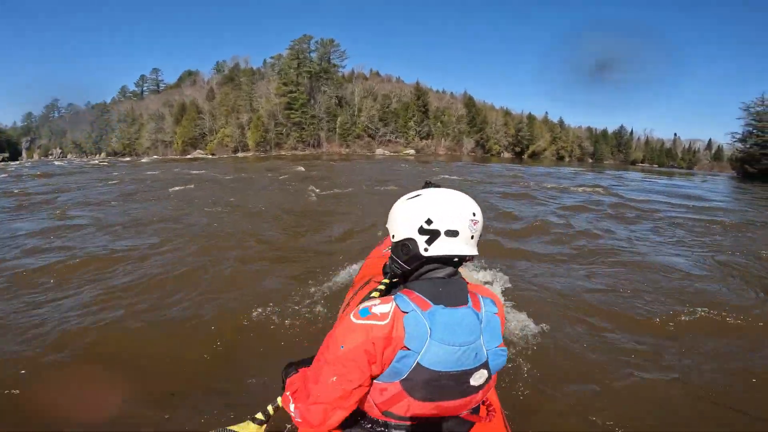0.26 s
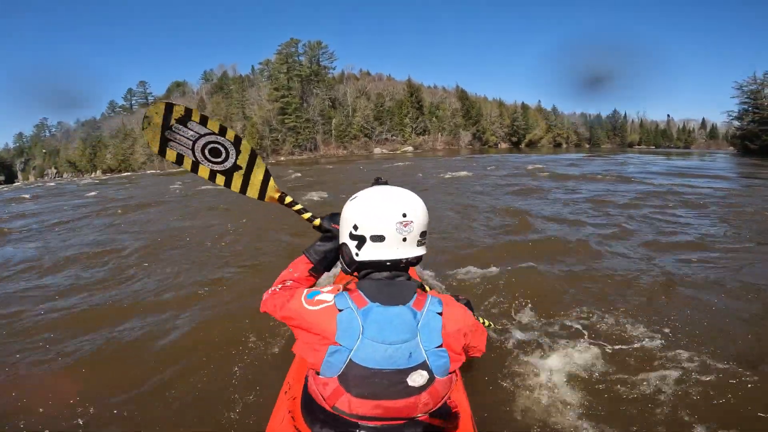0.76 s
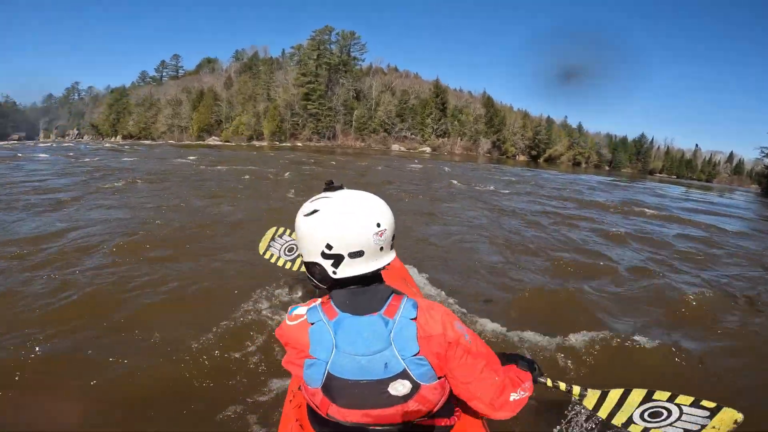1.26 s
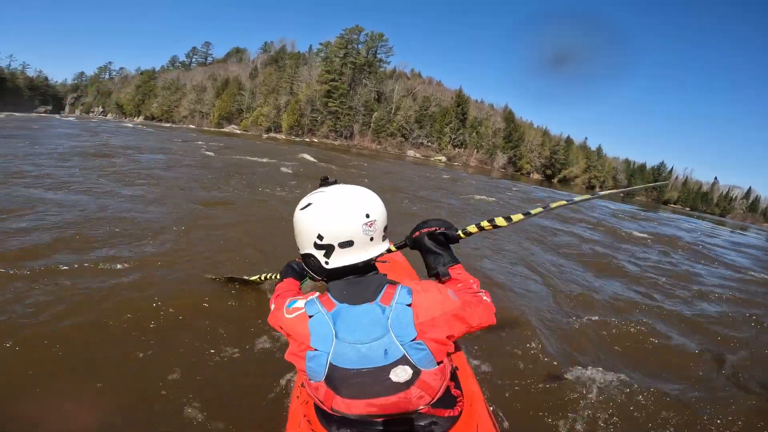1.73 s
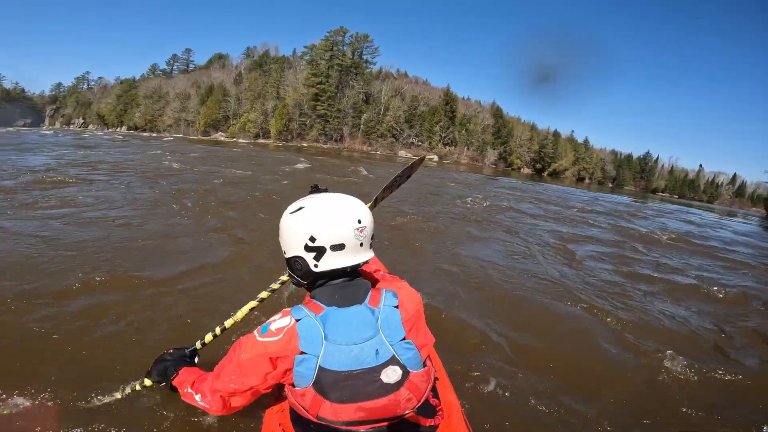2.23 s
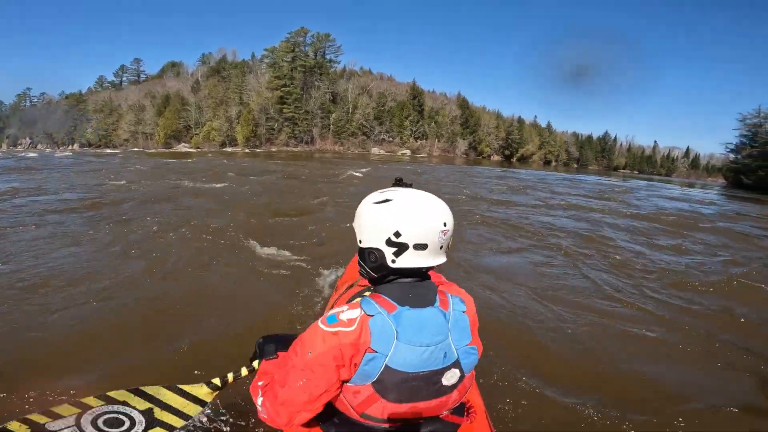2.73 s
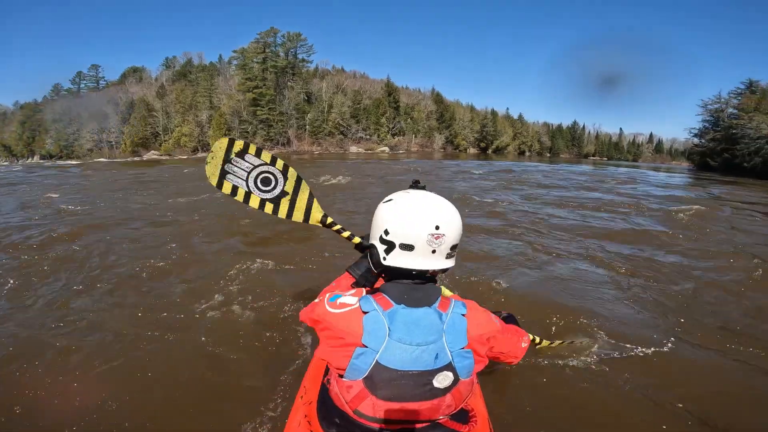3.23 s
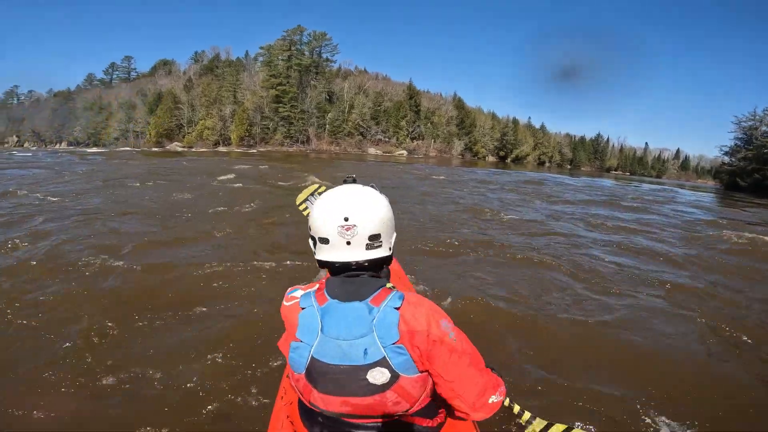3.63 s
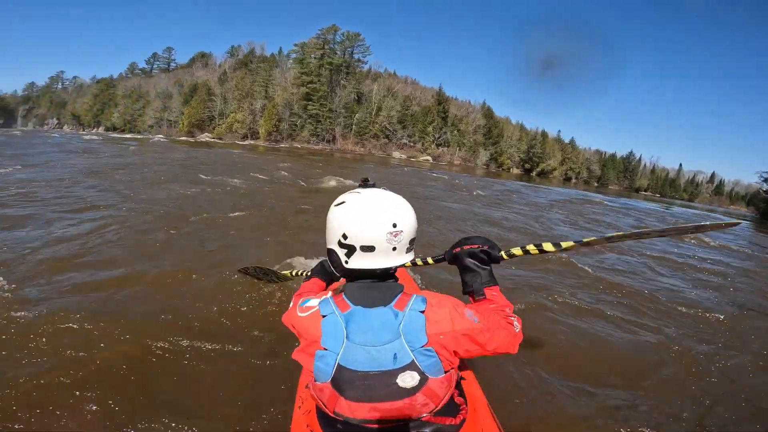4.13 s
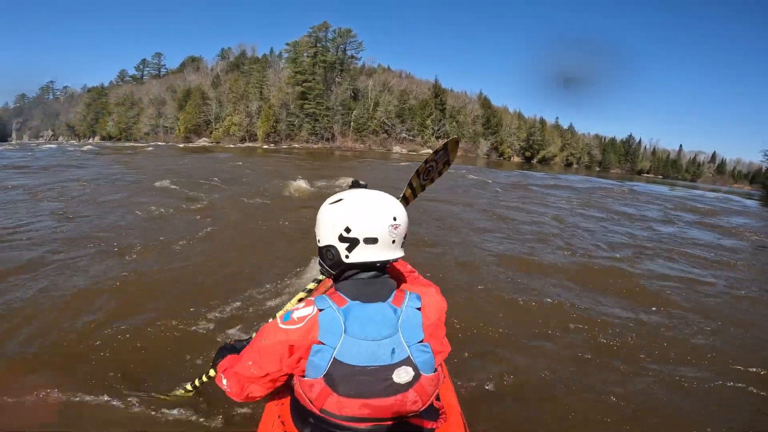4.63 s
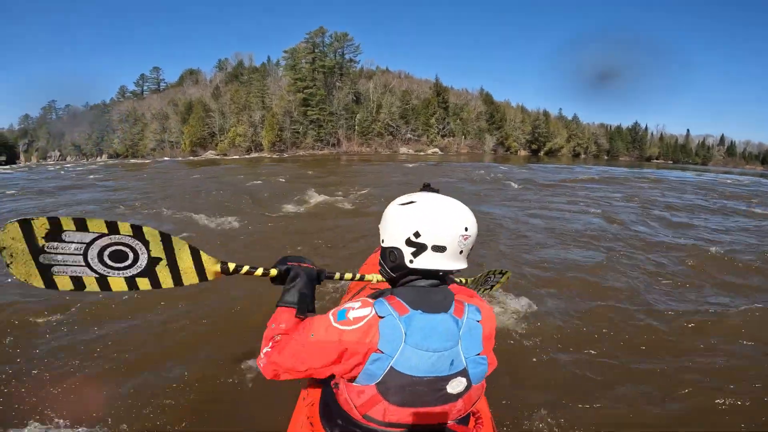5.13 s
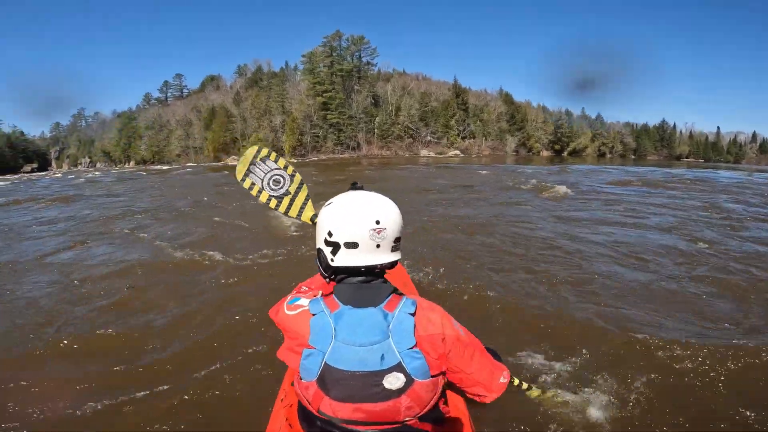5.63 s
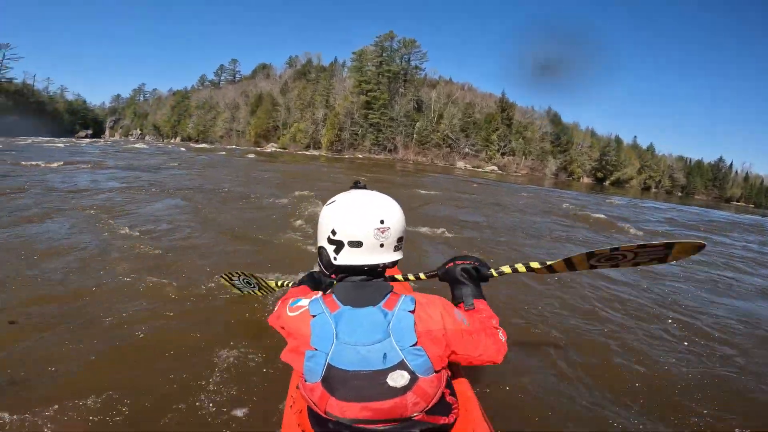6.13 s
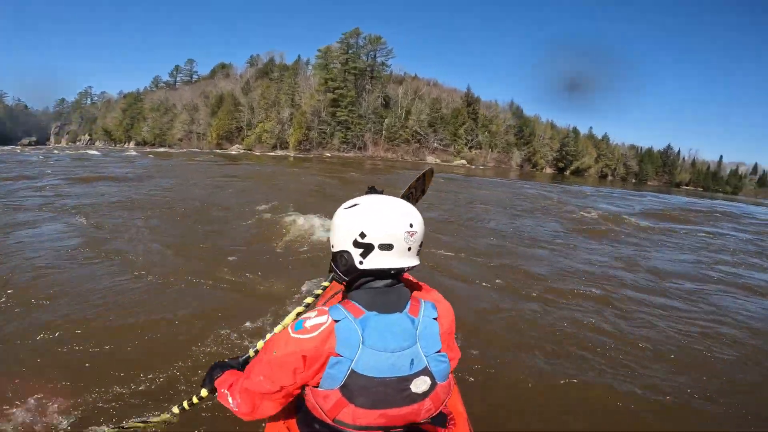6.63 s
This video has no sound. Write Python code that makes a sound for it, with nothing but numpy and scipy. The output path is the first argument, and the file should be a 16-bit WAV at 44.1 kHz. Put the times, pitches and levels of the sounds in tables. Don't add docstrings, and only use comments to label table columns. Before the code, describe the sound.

On a fast river, a microphone rides the stern of a plastic kayak. From 0 to 1 s a paddle stroke throws bright, grainy spray; sheets of water land, bubbles pop, drops tick on the housing, and wind buffets in low, heavy thumps. Between about 1 and 1.3 s the open hiss fades rapidly and the sound becomes muffled, briefly spreading wider before narrowing toward the centre. From 1.5 to 2.5 s it is quiet, with small hollow plops and slaps. Around 2.6 to 3.6 s waves boom in the hull, with a cluster of knocks and deep glugs. It calms somewhat around 4 s, with low gurgles and soft wind. From 5 to 6.8 s sloshing, slaps and rounded glugs grow busier again. Very faint rapids and a thin, high crackle of droplets at the left linger beneath.

```python
import sys
import numpy as np
from scipy import signal
from scipy.fft import rfft, irfft, next_fast_len
from scipy.io import wavfile
from scipy.ndimage import uniform_filter1d, map_coordinates

SR = 44100
rng = np.random.default_rng(int(sys.argv[2]) if len(sys.argv) > 2 else 0)


def master(y):
    cut = np.clip(np.atleast_2d(y).T, -1, 1)
    pcm = np.round(cut * 32767)
    wavfile.write(sys.argv[1], SR, pcm.astype(np.int16))


def attenuation_scalar(level_db):
    decades = np.asarray(level_db, float) / 20
    return 10 ** decades


N = 302967
SPRAY_FADE_DB_PER_S, BODY_FADE_DB_PER_S = 53.5, 50.5


def unit(x):
    return x / np.sqrt(np.mean(x ** 2) + 1e-20)


def add(track, start, sound):
    track[start:start + len(sound)] += sound


def curves(rows):
    s, *cols = np.transpose(rows)
    return [np.interp(np.arange(N) / SR, s, c) for c in cols]


def filtered(x, response):
    m = next_fast_len(N + SR // 2)
    return irfft(rfft(x, m) * response(np.fft.rfftfreq(m, 1 / SR)), m)[..., :N]


def lowpass(x, hz, power):
    return filtered(x, lambda f: 1 / (1 + (f / hz) ** power))


def tone(points):
    f, v = np.transpose(points)
    return lambda hz: attenuation_scalar(np.interp(np.log(hz + 1), np.log(f + 1), v, -120, -120))


def modes(table):
    def response(f):
        total = 0
        for k, (c, w, db) in enumerate(table):
            total = total + (-1) ** k * attenuation_scalar(db) * 1j * f * w / (c * c - f * f + 1j * f * w)
        return total
    return response


def churn(patchy_db, grain_db, grain_rate):
    z = signal.stft(rng.standard_normal(N), nperseg=512)[2]
    field = uniform_filter1d(uniform_filter1d(rng.standard_normal(z.shape), 8, 0), 5, 1)
    x = signal.istft(z * attenuation_scalar(patchy_db * unit(field)), nperseg=512)[1][:N]
    knots = rng.standard_normal(N // 16)
    grain = map_coordinates(knots, [np.arange(N) * min(grain_rate, 2500) / SR], order=1)
    return x * attenuation_scalar(grain_db * grain)


def droplets(rate, spread_db):
    chance, size = rng.random(N), rng.exponential(size=N)
    return unit((chance < rate / SR) * attenuation_scalar(spread_db * size))


def surges(peak_s, peak_db, fall_s, rise_share, calm_db):
    t = np.arange(0, N + 64, 64) / SR
    late = (t[:, None] - peak_s) / np.maximum(fall_s, .003)
    away = np.where(late < 0, -late / rise_share, late)
    gain = np.sqrt(attenuation_scalar(calm_db) ** 2 + np.sum(attenuation_scalar(peak_db - 10 * away) ** 2, axis=1))
    return np.interp(np.arange(N) / SR, t, gain)


def steadied(x, seconds, share):
    size = max(int(seconds * SR), 1)
    power = np.abs(uniform_filter1d(uniform_filter1d(x ** 2, size), size))
    return unit(x / (power + 1e-12) ** (np.clip(share, 0, 1) / 2))


def ring(s, db, hz, t60, rise, rough, attack):
    t = np.arange(SR // 4) / SR
    drift = np.cumsum(rng.standard_normal(len(t))) * rough
    shape = attenuation_scalar(db - 60 * t / np.clip(t60, .002, .3)) * (1 - np.exp(-t / attack))
    return round(s * SR), shape * np.sin(2 * np.pi * hz * t * (1 + rise * t) + drift)


def faded_s():
    return np.maximum(np.arange(N) / SR - 1.0, 0)


def sheltered():
    return np.clip((np.arange(N) / SR - 1.05) / 0.14, 0, 1)


# (time [s], level [dB])
SPLASH_LEVEL = [
    (0, -38),
    (.11, -40),
    (.28, -34.5),
    (.34, -36.5),
    (.55, -33),
    (.75, -35),
    (1.0, -36),
]
# (frequency [Hz], level per Hz [dB])
HISS_TONE = [(900, -10), (1500, -4.5), (3330, -3.5), (5060, -8), (5980, -11), (7350, -25), (8500, -36.5),
             (10500, -47), (12000, -48.5), (15700, -73)]
# (time [s], peak level [dB], time to fall 10 dB [s])
SHEETS = [(0.024, -23, -0.1), (0.093, -34.5, -0.1), (0.128, -44, 0.1), (0.192, -33.5, -0.09),
          (0.2117, -41, -0.1), (.3656, -33, -0.04), (.435, -35, -0.04), (.5067, -49, 0.5), (.5252, -34, 0),
          (0.56, -28, 0.01), (.6085, -26.5, 0.02), (.6809, -39, 0.1), (.72, -36.5, 0.1),
          (0.9025, -40, 0.04)]


def spray_hiss():
    grains = unit(churn(patchy_db=.9, grain_db=1.6, grain_rate=900))
    hiss = unit(filtered(grains + .3 * droplets(rate=500, spread_db=2.2), tone(HISS_TONE)))
    sheet_gain = surges(*np.transpose(SHEETS), rise_share=0.59, calm_db=-90)
    sheets = sheet_gain * lowpass(np.roll(hiss, SR), 5200, 4)
    fade = np.hypot(attenuation_scalar(-SPRAY_FADE_DB_PER_S * faded_s()), attenuation_scalar(-20.5 - 21.5 * faded_s()))
    return fade * (attenuation_scalar(curves(SPLASH_LEVEL)[0] - 0.83) * hiss + sheets)


# (frequency [Hz], level per Hz [dB])
SPLASH_BODY_TONE = [(150, -11), (250, 5), (500, -2), (1000, -6.5), (1700, -14.5), (2600, -40)]


def splash_body():
    body = unit(filtered(churn(patchy_db=1.34, grain_db=1.5, grain_rate=210), tone(SPLASH_BODY_TONE)))
    heave = surges(0.375, -30, 0.18, rise_share=0.23, calm_db=-33)
    return heave * attenuation_scalar(1.5 - BODY_FADE_DB_PER_S * faded_s()) * body


def bubbling(rate, hz, spread, cycles):
    start, pitch, size = rng.random((3, int(rate * N / SR)))
    pitch_hz, t = hz * np.exp(spread * (2 * pitch[:, None] - 1)), np.arange(512) / SR
    age = t * pitch_hz / cycles
    shape = (size[:, None] + .03) ** -.6 * age * np.exp(-3 * age)
    wave = shape * np.sin(2 * np.pi * pitch_hz * t * (1 + 0.11 * age))
    where = (start[:, None] * N).astype(int) + np.arange(512)
    return unit(np.bincount(where.ravel(), wave.ravel(), N + 512)[:N])


def froth():
    s, db, fall_s, bright_db = np.transpose(SHORT_WAVES)
    splash_db = curves(SPLASH_LEVEL)[0] - SPRAY_FADE_DB_PER_S * faded_s()
    plips = sheltered() * surges(s, db + bright_db - 31, fall_s, rise_share=0.42, calm_db=-85)
    foam = lowpass(bubbling(260, 2300, .7, 8), 5000, 8)
    return attenuation_scalar(splash_db - 9) * foam + plips * bubbling(90, 1150, .45, 9)


# (time [s], peak level [dB], time to fall 10 dB [s])
WIND_GUSTS = [(.05, -21, .5), (.46, -21.5, 0.32), (.72, -23.5, .5), (1.14, -21.5, 0.1), (1.419, -26, -0.94),
              (1.55, -30, -1.27), (1.86, -38.5, 0.14), (2.09, -40.5, 0.1), (2.242, -31, 0.03),
              (2.47, -39, 0.5), (2.64, -32, 0.16), (2.81, -35, 0.37), (3.17, -33, 0.26), (3.46, -38, 0.13),
              (3.65, -35, 0.22), (3.9, -32.5, 0.2), (4.08, -37, 0.36), (4.27, -39, 0.5), (4.57, -30.5, 0),
              (4.93, -36, 0.53), (5.15, -42, 0.5), (5.4, -36, .15), (5.52, -42.5, -0.2), (5.75, -42, 0),
              (5.87, -32.5, 0.12), (6.06, -32, 0.31), (6.18, -31, 0.18), (6.43, -31, 0.26),
              (6.54, -38, -0.3), (6.86, -33, 0.1)]
# (frequency [Hz], level per Hz [dB])
WIND_TONE = [(10, -17), (22, 1), (38, -5.5), (62, -3.5), (100, -5), (170, -15.5), (300, -27.5), (600, -40)]


def wind():
    gusts = surges(*np.transpose(WIND_GUSTS), rise_share=0.87, calm_db=-56.5)
    lump_s = 0.0029
    lump = -attenuation_scalar(-19 - 10 * np.arange(N) / SR / lump_s)
    lump += attenuation_scalar(-30.5 - 10 * np.arange(N)[::-1] / SR / lump_s)
    air = filtered(rng.standard_normal(N), tone(WIND_TONE))
    deep = lowpass(air, 65, 4)
    even = sum(np.std(part) * steadied(part, seconds=0.071, share=0.7) for part in (deep, air - deep))
    return lump + attenuation_scalar(-2.5) * gusts * unit(even)


# (time [s], level [dB])
RAPIDS_LEVEL = [
    (0, -76),
    (2, -72),
    (4, -70),
    (6.7, -71),
    (6.87, -70.5),
]
# (frequency [Hz], level per Hz [dB])
RAPIDS_TONE = [(700, -8.5), (1700, -3.5), (2490, -3.5), (3300, -3.5), (3910, -9), (5090, -11), (7350, -20),
               (8500, -37), (10500, -53)]


def rapids():
    wash = filtered(churn(patchy_db=2.0, grain_db=-0.5, grain_rate=150), tone(RAPIDS_TONE))
    return attenuation_scalar(curves(RAPIDS_LEVEL)[0]) * unit(wash)


# (time [s], peak level [dB], frequency [Hz])
HOUSING_DROPS = [(0.0203, -21, 4200), (.024, -14.5, 3340), (0.062, -24, 3340), (0.163, -27, 2980),
                 (0.215, -22, 2480), (0.286, -32, 3400), (.303, -30, 4000), (0.364, -29, 3450),
                 (1.359, -49, 5460), (1.385, -51, 2460), (0.457, -21.5, 5500), (1.181, -30.5, 5670),
                 (1.2696, -39, 3900), (2.4259, -53, 3600), (3.638, -57, 3800), (4.3354, -55.5, 3700),
                 (5.438, -54.5, 4460)]


def housing_ticks():
    ticks = np.zeros(N + SR)
    for s, db, hz in HOUSING_DROPS:
        add(ticks, *ring(s, db + 4.5, hz, 0.0069, rise=.1, rough=0.34, attack=0.0003))
    return lowpass(ticks[:N], 6800, 12)


# (time [s], peak level [dB], frequency [Hz], time to fall 60 dB [s])
SPLASH_BUBBLES = [
    (0.025, -13, 1900, 0.036),
    (0.0275, -11.5, 3410, 0.013),
    (0.195, -22.5, 2370, 0.029),
    (0.2114, -15.5, 1010, 0.022),
    (0.287, -14, 2322, 0.029),
    (0.435, -21, 1180, 0.034),
    (0.5592, -21, 2430, 0.037),
    (0.609, -13.5, 1850, 0.018),
]


def splash_bubbles():
    pops = np.zeros(N + SR)
    for s, db, hz, t60 in SPLASH_BUBBLES:
        add(pops, *ring(max(s - .004, 0), db - 2.0, hz, t60, rise=1.5, rough=0.2, attack=0.0028))
    return lowpass(pops[:N], 6000, 10)


# (time [s], peak level [dB], frequency [Hz])
WHIRLS = [(0.034, -15, 97), (0.088, -12, 87.5), (0.176, -13, 127.9), (0.215, -14, 50.9),
          (0.241, -14.5, 122), (0.31, -14, 59.4), (0.369, -9.5, 135.0), (0.466, -13.5, 66.7),
          (0.518, -13.5, 82.9), (0.698, -24, 66.7), (0.712, -17.4, 135.0), (0.795, -25.5, 70),
          (0.878, -15.5, 50.9), (0.993, -18, 104), (1.098, -19.5, 127.9), (1.151, -18, 97.5),
          (1.203, -27, 92.3), (1.551, -39, 79), (2.068, -33, 87.5), (2.11, -40, 114.7),
          (3.07, -32.2, 121.1), (3.423, -30, 74.3), (3.672, -26, 114), (3.927, -31, 83), (4.085, -27, 113),
          (4.248, -30, 74.3), (4.34, -28.5, 102.9), (4.926, -30.5, 121.1), (6.016, -30, 87.5),
          (6.077, -23.5, 50.6), (6.168, -25, 28.0), (6.216, -28, 53.7), (6.271, -31, 48.2),
          (6.439, -31, 28.0)]


def eddies():
    swings, t = np.zeros(N + SR), np.arange(-SR // 10, SR // 10) / SR
    for (s, db, hz), turn in zip(WHIRLS, rng.random(len(WHIRLS))):
        shape = attenuation_scalar(db - 2) * np.exp(-.5 * (t * hz / 0.61) ** 2)
        add(swings, round(s * SR), shape * np.cos(2 * np.pi * (hz * t + turn)))
    return swings[SR // 10:][:N]


def driven(table, low_hz, top_hz, patchy_db, grain_db, drops):
    def response(f):
        low_edge = (f / low_hz) ** 3 / (1 + (f / low_hz) ** 3)
        return (attenuation_scalar(-44.0) + modes(table)(f)) * low_edge / (1 + (f / top_hz) ** 6)
    push = unit(churn(patchy_db, grain_db, grain_rate=66)) + drops * droplets(rate=70, spread_db=2.5)
    return steadied(filtered(push, response), seconds=0.041, share=0.73)


# (frequency [Hz], width [Hz], level [dB])
HULL_MODES = [(164, 12.5, -3.5), (220.6, 25, -8), (308, 22.8, -9.5), (426.3, 29.3, -16.5), (608, 18.4, -27),
              (835, 100, -32.5), (1010, 65, -34.5), (1190, 59, -28), (1280, 52, -30.5), (1540, 120, -34)]
# (time [s], peak level [dB], time to fall 10 dB [s])
LONG_WAVES = [(.2, -27, -0.02), (0.361, -24.5, 0.17), (.68, -29, 0.39), (1.15, -38.5, 0.43),
              (2.45, -42.5, 0.46), (2.54, -44, 0.04), (2.68, -35, 0.09), (2.83, -31.5, 0.18),
              (3.02, -39, 0.07), (3.14, -37.5, 0.07), (3.46, -32.5, 0.1), (3.58, -33, 0.08),
              (3.808, -33.5, 0.1), (3.95, -35.5, 0.2), (4.27, -36, -0.02), (4.7, -35.5, 0.46),
              (4.96, -43.5, 0.4), (5.33, -33.5, 0.13), (5.74, -31, 0.04), (5.87, -35.5, 0.2),
              (6.02, -36.5, -0.16), (6.179, -34.5, 0.2), (6.44, -33, 0.26)]
# (time [s], peak level [dB], time to fall 10 dB [s], brightness [dB])
SHORT_WAVES = [(.35, -23, 0.1443, 7), (.55, -33, 0.11, 10), (.9, -33.5, 0.41, 2), (1.3, -46, .5, -1),
               (1.97, -44, 0.14, -11), (2.22, -45.5, 0.16, 2.5), (2.68, -38, 0.16, -1),
               (2.85, -41.5, 0.23, 3.5), (2.95, -36.5, 0.0548, -1.5), (2.999, -31.5, 0.05, -14),
               (3.1, -40.5, 0.26, -0.5), (3.39, -43.5, 0.18, 3), (3.57, -42, 0.14, 4),
               (3.84, -40, -0.13, 10), (4.0, -39, 0.12, -3.5), (4.26, -46, 0.4, -3.5),
               (4.76, -37.5, 0.23, -12.5), (5.09, -38, 0.11, 1), (5.24, -38.5, 0.15, 3.5),
               (5.74, -48, 0, 2), (5.831, -34, 0.15, -11), (5.93, -39, 0.08, -0.5), (6.05, -37.5, 0.05, -2),
               (6.22, -36, 0.31, 3), (6.4, -35, -0.13, -3.5), (6.849, -29, 0, -6)]


def hull():
    swell_s, swell_db, swell_fall_s = np.transpose(LONG_WAVES)
    s, db, fall_s, bright_db = np.transpose(SHORT_WAVES)
    boom = surges(swell_s, swell_db - 1.5, swell_fall_s, rise_share=0.42, calm_db=-62.0)
    boom *= driven(HULL_MODES[:1], low_hz=104, top_hz=264, patchy_db=0.5, grain_db=-0.2, drops=0.21)
    slosh = surges(s, db - 3.5, fall_s, rise_share=0.5, calm_db=-58.0)
    slosh *= driven(HULL_MODES[1:4], low_hz=130, top_hz=480, patchy_db=3.0, grain_db=2.5, drops=0.49)
    lap = surges(s, db - 22.5 + bright_db, fall_s, rise_share=0.77, calm_db=-67)
    lap *= driven(HULL_MODES[4:6], low_hz=480, top_hz=950, patchy_db=3.5, grain_db=-0.5, drops=0.37)
    trickle = surges(s, db - 26.5 + 1.03 * bright_db, 1.12 * fall_s, rise_share=.7, calm_db=-68.5)
    trickle *= driven(HULL_MODES[6:], low_hz=850, top_hz=1900, patchy_db=1.5, grain_db=2.0, drops=0.27)
    return boom + slosh + sheltered() * (lap + trickle)


# (time [s], peak level [dB], time to fall 10 dB [s])
FIZZ_PUFFS = [
    (.7, -81.5, 0),
    (3.1, -74, 0.5),
    (3.55, -72.5, 0.3),
    (3.85, -71.5, .3),
    (4.35, -76.5, 0.2),
    (5.35, -79, 1.6),
    (6.8, -76, 0.6),
]
# (frequency [Hz], level per Hz [dB])
FIZZ_COLOUR = [(9000, -45), (10900, -41.5), (11600, -5.5), (12400, 4), (13300, -3), (14300, -12),
               (15000, -12.5), (15750, -13.5)]
# (time [s], peak level [dB])
PORT_DROPLETS = [(2.5809, -57.5), (2.8274, -60), (3.2968, -57.5), (3.433, -60.5), (3.4674, -57),
                 (3.64, -59), (3.7802, -57), (4.4696, -60), (4.7, -64), (5.4699, -59), (5.8435, -53),
                 (6.6512, -58.5), (2.157, -56.5), (2.6832, -50), (3.0215, -53.5), (3.1672, -52.5),
                 (3.528, -46.5), (3.5465, -58.5), (3.5606, -38), (3.7045, -57), (3.9489, -58.5),
                 (4.3348, -51), (4.5174, -59.5), (5.302, -49.5), (5.322, -59), (5.437, -48),
                 (6.7446, -60.5), (6.765, -49), (6.796, -56)]


def fizz():
    bed = unit(filtered(churn(patchy_db=-2.5, grain_db=3.0, grain_rate=1200), tone(FIZZ_COLOUR)))
    puffs = surges(*np.transpose(FIZZ_PUFFS), rise_share=.9, calm_db=-80)
    ticks = np.zeros(N)
    for s, db in PORT_DROPLETS:
        ticks[round(s * SR)] = attenuation_scalar(db)
    ticks = filtered(ticks, lambda f: modes([(12300, 1300, 11)])(f) ** 2 + attenuation_scalar(11))

    def port_band(f):
        return (1 / (1 + (11300 / (f + 1)) ** 30) + .03 * (f > 7500)) * (f < 15600)
    return attenuation_scalar(6) * puffs * bed + filtered(ticks, port_band)


# (time [s], peak level [dB], frequency [Hz], time to fall 60 dB [s])
LARGE_SLAPS = [(1.209, -22, 900, .017), (1.465, -38.5, 608, 0.095), (1.91, -32.5, 425, 0.11),
               (2.105, -34.5, 608, 0.076), (2.169, -33.5, 744, 0.072), (2.205, -29, 584, 0.022),
               (2.424, -34, 720, 0.051), (2.54, -35.5, 610, 0.042), (2.533, -42, 900, .03),
               (2.653, -28.5, 608, 0.082), (1.506, -35, 608, 0.064), (3.084, -29, 500, 0.034),
               (2.649, -32, 527, 0.052), (1.805, -42.5, 646, 0.059), (2.255, -39, 606, .09),
               (2.305, -44, 608, 0.1), (2.395, -41, 620, 0.12), (2.765, -45, 604, .04),
               (2.804, -40, 594, 0.076), (2.835, -32, 603, .05), (2.899, -38, 608, 0.044),
               (3.482, -46, 762, .04), (3.566, -46, 600, 0.035), (4.03, -44, 595, 0.055),
               (5.151, -37, 565, 0.044), (6.049, -40.5, 592, .05), (6.264, -36, 617, 0.069),
               (6.372, -35, 636, 0.045), (2.833, -30, 800, .04), (2.939, -39, 634, .052),
               (2.989, -34.5, 571, 0.11), (3.089, -26, 785, 0.063), (3.39, -39, 575, .035),
               (3.978, -40, 608, 0.11), (4.699, -43, 600, 0.13), (5.066, -35, 612, 0.052),
               (5.217, -35, 555, 0.049), (5.319, -32.5, 723, 0.053), (5.711, -36.5, 618, 0.079),
               (5.78, -34, 760, 0.037), (5.809, -35.5, 604, .11), (5.934, -37, 577, 0.048),
               (6.167, -30.5, 622, 0.057), (6.277, -31.5, 850, 0.078), (6.356, -40, 724, 0.054)]
# (time [s], peak level [dB], frequency [Hz], time to fall 60 dB [s])
SMALL_SLAPS = [(1.208, -20.5, 1190, 0.019), (2.206, -33, 1120, 0.027), (1.428, -50, 1160, .03),
               (1.604, -46, 1034, 0.043), (1.649, -48, 1350, 0.048), (1.765, -51.5, 1230, .04),
               (2.488, -49.5, 1680, 0.043), (2.676, -51, 1190, .05), (2.713, -49, 1270, 0.072),
               (2.73, -44, 1190, 0.038), (2.732, -43.5, 1590, .025), (2.8, -50, 1850, .03),
               (2.876, -52, 1100, .03), (2.895, -46, 1220, .04), (2.906, -52, 1030, .03),
               (2.997, -45, 1230, 0.045), (3.114, -52, 1150, .03), (3.139, -51, 1246, .08),
               (3.329, -52, 1260, 0.055), (3.494, -48, 1180, .05), (4.96, -48, 1190, .03),
               (5.149, -48, 1260, .07), (5.304, -48, 1240, 0.073), (5.381, -51.5, 1050, 0.14),
               (5.989, -47, 1175, 0.064), (6.181, -45, 1200, .03), (6.296, -45, 1780, 0.033),
               (6.3, -44, 1270, 0.098), (6.33, -48, 1240, .03), (6.398, -56, 1110, 0.036),
               (2.805, -48, 1280, 0.052), (2.828, -48, 1240, 0.066), (2.939, -43, 1280, .052),
               (2.99, -46, 1020, 0.068), (3.093, -37.5, 1230, 0.04), (3.39, -37.5, 1200, 0.037),
               (3.531, -40.5, 1280, 0.1), (3.621, -44.5, 1270, 0.037), (5.067, -47, 1240, 0.054),
               (5.158, -44, 1505, 0.06), (5.217, -39.5, 1250, 0.076), (5.712, -49, 1440, .03),
               (5.809, -47, 1280, 0.09), (5.934, -44, 1045, 0.057), (6.168, -34.5, 1404, 0.046),
               (6.2, -38, 1260, 0.057), (6.225, -40, 1130, 0.043), (6.255, -39, 1490, 0.031),
               (6.276, -45, 1010, 0.068), (6.355, -40, 1280, 0.032)]


def slaps():
    cavities = np.zeros(N + SR)
    for s, db, hz, t60 in LARGE_SLAPS:
        add(cavities, *ring(s, db - 6.5, hz, t60 * 1.1, rise=0.14, rough=0.027, attack=0.0032))
    for s, db, hz, t60 in SMALL_SLAPS:
        add(cavities, *ring(s, db, hz, t60, rise=1.1, rough=0.075, attack=0.0009))

    def shell(f):
        return (0.9 + attenuation_scalar(16.5) * modes(HULL_MODES[4:])(f)) / (1 + (f / 1900) ** 6)
    return filtered(cavities[:N], shell)


# (time [s], peak level [dB], frequency [Hz], time to fall 60 dB [s])
AIR_POCKETS = [(1.524, -43, 314, .12), (1.664, -35.5, 316, .08), (1.98, -38.5, 291, 0.18),
               (2.207, -37.5, 288, 0.093), (2.42, -41, 314, .12), (2.649, -24, 149, 0.11),
               (2.829, -28, 222, 0.14), (2.859, -24, 170, 0.09), (2.944, -34, 307, .1),
               (2.999, -28, 251, 0.14), (3.0, -40, 410, 0.076), (3.88, -38.5, 298, 0.18),
               (4.24, -29.5, 163, 0.24), (4.709, -38.5, 305.5, .3), (5.07, -40, 424, 0.18),
               (5.215, -38, 314, .12), (5.718, -38, 312, .15), (6.061, -36.5, 414, 0.11),
               (6.471, -33, 159, .4), (6.823, -32, 292, 0.11), (1.674, -28, 254, 0.058),
               (1.989, -34.5, 152, 0.37), (2.207, -29, 145, 0.2), (2.675, -19, 208, 0.12),
               (2.756, -26, 160, 0.13), (2.999, -29, 156, 0.16), (3.094, -22.5, 294.4, 0.083),
               (3.241, -31.5, 198.6, 0.16), (3.425, -27.5, 164, 0.4), (3.565, -33, 178.7, 0.36),
               (3.81, -28.5, 161.6, 0.36), (4.477, -37, 209.4, 0.34), (4.577, -29, 159.4, 0.14),
               (4.71, -28, 228, 0.33), (5.008, -22.5, 171, 0.067), (5.076, -29, 174.6, 0.24),
               (5.173, -27, 204.3, 0.15), (5.295, -25, 211.3, 0.22), (5.376, -22, 187.3, 0.17),
               (5.359, -36, 80, .2), (5.815, -23, 228, 0.21), (5.875, -28, 205.4, 0.23),
               (6.128, -30, 180, 0.11), (6.27, -27, 167.3, 0.45), (6.389, -24.5, 164, 0.42),
               (6.83, -24, 147, 0.19)]


def glugs():
    pockets = np.zeros(N + SR)
    for s, db, hz, t60 in AIR_POCKETS:
        add(pockets, *ring(s, db - .5, hz, t60, rise=0.41, rough=0.0057, attack=0.004))
    return lowpass(pockets[:N], 6800, 12)


# (time [s], level [dB])
SIDE_DIFFERENCE = [
    (0, -55),
    (1.1, -38),
    (1.2, -21),
    (1.5, -12.5),
    (2.2, -26),
    (2.25, -35),
    (3, -43.5),
    (6.87, -48.5),
]


def side_blur(centre):
    hz, _, z = signal.stft(centre, SR, nperseg=1024)
    hz = hz[:, None]
    blurred = z * rng.standard_normal(z.shape)
    blur = signal.istft(blurred * attenuation_scalar(-6 + 3.07 * np.log2(hz / 100 + 1)), SR, nperseg=1024)[1][:N]
    patches = uniform_filter1d(uniform_filter1d(rng.standard_normal(z.shape), 16, 0), 4, 1)
    treble = attenuation_scalar(2.0) / (1 + (8000 / (hz + 1)) ** 4) * (hz < 11500) * (unit(patches) > .4)
    drops = signal.istft(blurred * treble, SR, nperseg=1024)[1][:N]
    return attenuation_scalar(curves(SIDE_DIFFERENCE)[0]) * blur + (1 - .3 * sheltered()) * drops


def scene():
    splash = spray_hiss() + splash_body() + splash_bubbles()
    water = rapids() + housing_ticks() + hull() + slaps() + glugs()
    centre = splash + wind() + water
    side = side_blur(centre)
    return np.array([centre + side + fizz(), centre - side]) + eddies() + froth()


def band_limit(x):
    return signal.sosfilt(signal.butter(12, 15720, fs=SR, output="sos"), x)


def record(dry):
    limited = dry / (1 + (dry / .42) ** 4) ** (1 / 4)
    mix = limited + attenuation_scalar(-108) * rng.standard_normal(dry.shape)
    return band_limit(mix)


dry = scene()
out = record(dry)
master(out)
```